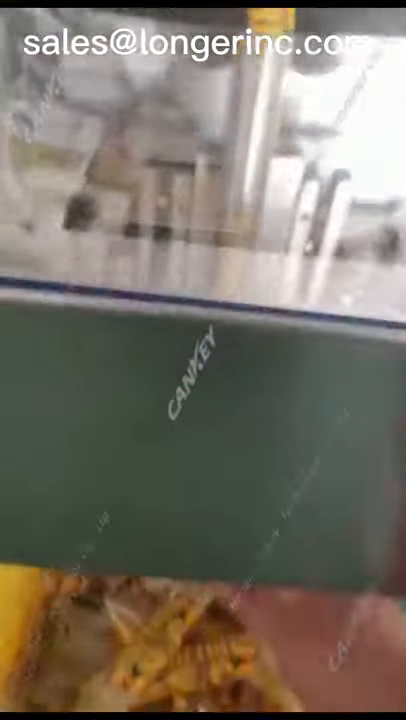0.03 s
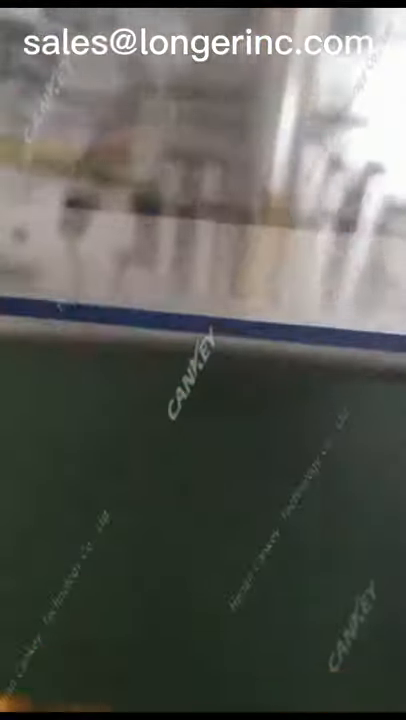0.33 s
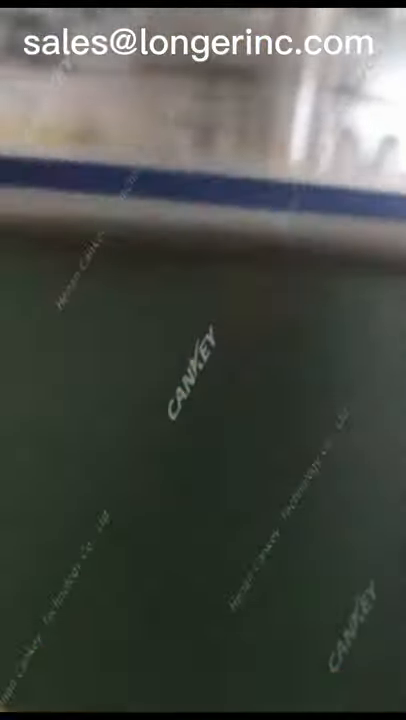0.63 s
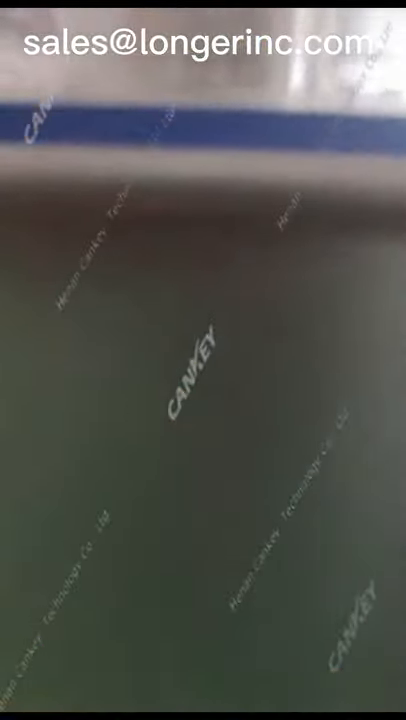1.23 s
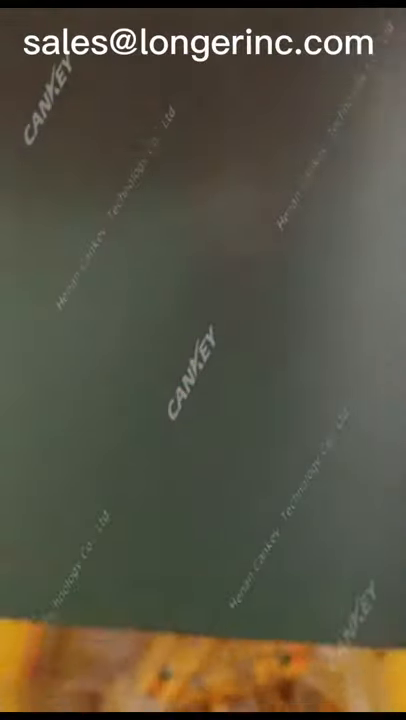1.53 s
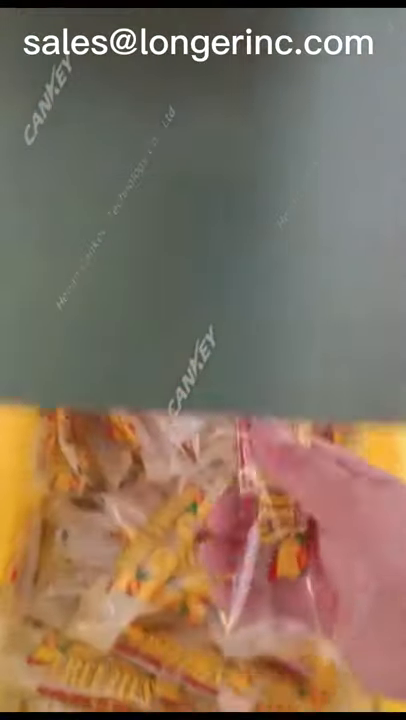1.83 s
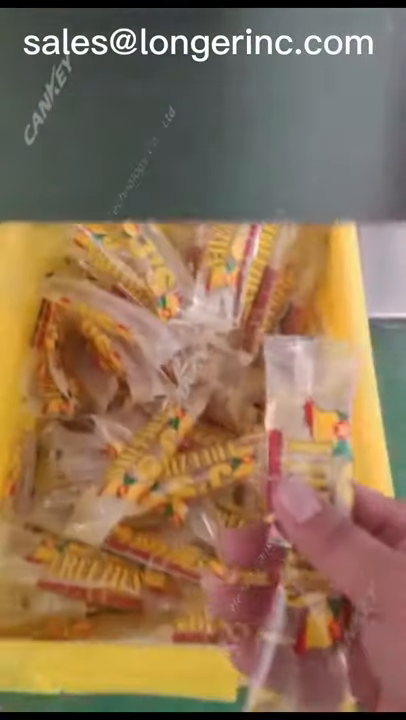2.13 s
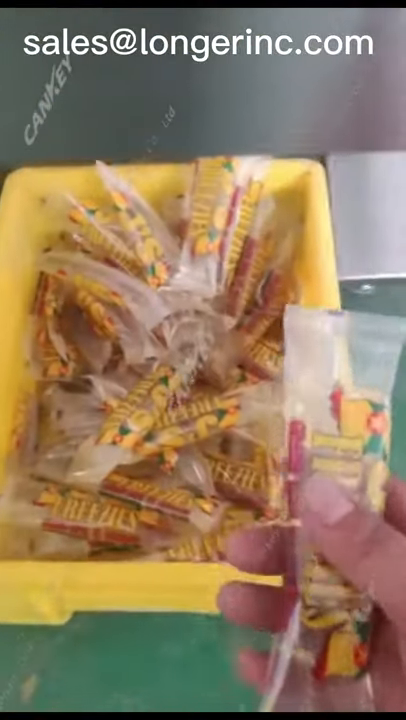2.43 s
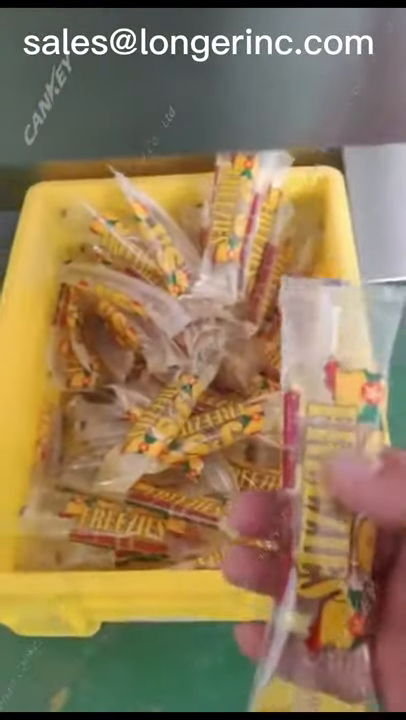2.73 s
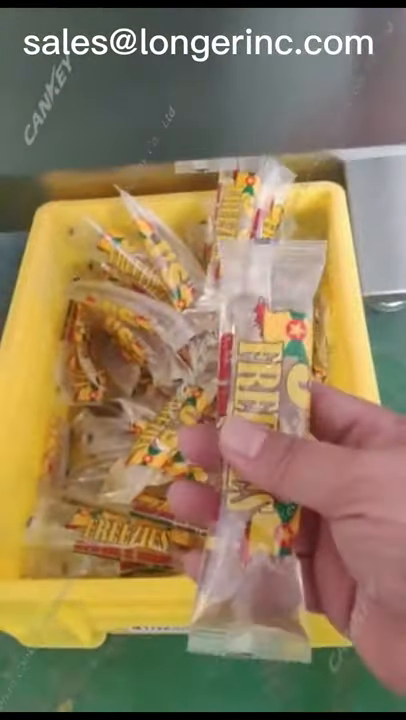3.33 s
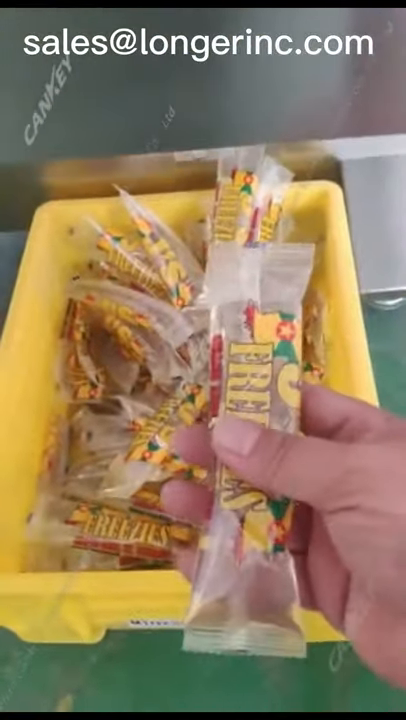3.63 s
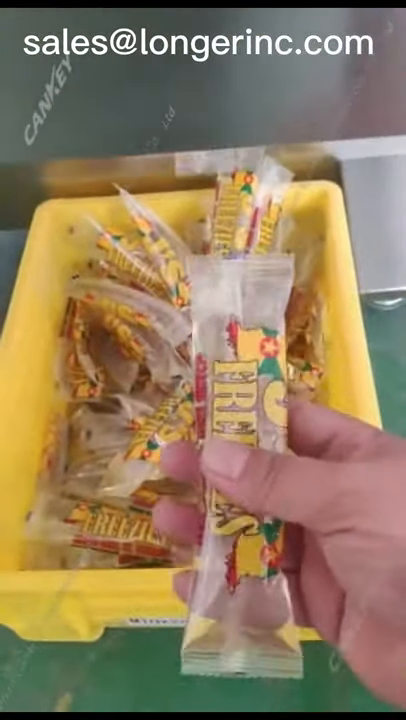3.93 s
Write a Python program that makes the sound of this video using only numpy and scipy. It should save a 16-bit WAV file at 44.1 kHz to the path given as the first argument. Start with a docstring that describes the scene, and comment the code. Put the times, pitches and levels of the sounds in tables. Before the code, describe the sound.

A packaging machine hums, hisses and whines while a hand rustles plastic pouches.

```python
"""A packaging machine idles in a factory hall throughout: low hum, air hiss and a motor's fluttering
4.2 kHz whine that swells and fades on each side. At 0.2 s a hand touches filled film pouches in a plastic
crate. From 1 s it digs in and lifts one out: pouches bump dully, film slides and rustles, creases snap.
After 2.7 s the machine is heard alone; from 3.5 s come a few last snaps, bumps and a short slide."""
import sys
import numpy as np
from scipy import signal
from scipy.fft import rfft, irfft, next_fast_len
from scipy.io import wavfile
from scipy.ndimage import uniform_filter1d, map_coordinates

SR = 44100
rng = np.random.default_rng(int(sys.argv[2]) if len(sys.argv) > 2 else 0)


def master(y):
    """Save y as 16-bit WAV."""
    cut = np.clip(np.atleast_2d(y).T, -1, 1)
    pcm = np.round(cut * 32767)  # scale
    wavfile.write(sys.argv[1], SR, pcm.astype(np.int16))


N = 176400

# left-right likeness: freq_hz, correlation
STEREO_LIKENESS = [(40, .87), (150, .88), (350, .76), (700, .35), (1500, 0), (2400, -.15), (7000, .05)]
# machine hum: freq_hz, density_db
HUM_SPECTRUM = [(12, -40.5), (20, -2.5), (86, -2.5), (125, -0.5), (150, -9), (171, -8.5), (198, -11),
                (308, -10.5), (427, -16), (456, -17.5), (733, -20), (782, -39), (1000, -28), (1300, -65),
                (2200, -120)]
# hum swell: time_s, gain_db
HUM_SWELL = [(0,-0.5), (1.3,3.5), (1.8,-3), (2.1,-2), (4,0)]
# air hiss: freq_hz, density_db
HISS_SPECTRUM = [(450, -48), (800, -10.5), (1050, -18), (1500, -18), (2000, -17), (2400, -17),
                 (3000, -21.5), (3850, -24), (4080, -20), (4330, -16.5), (4600, -23), (5000, -24.5),
                 (5450, -23), (5800, -19.5), (6350, -14.5), (6700, -16.5), (7450, -17.5), (9000, -65.5)]
# hiss swell: time_s, gain_db
HISS_SWELL = [(0, 4), (.6, -0.5), (.93, -1.5), (1.3, 6), (2.4, 1.5), (2.7, 3.5), (3.2, 2.5), (4, 2)]
# hiss balance: freq_hz, left_minus_right_db
HISS_BALANCE = [(800, -4.5), (2400, 2), (4500, 3), (6000, -1), (7200, -1.5)]
# low tones of the drives: pitch_hz, level_db
DRIVE_TONES = [(80.7,-52), (117.5,-51.5)]
# weak second whine, its sidebands and two faint tones: pitch_hz, level_db
FAINT_TONES = [(4000, -61), (4010, -56), (4047, -65), (3753, -64.5), (6315, -62)]
# motor whine pitch: time_s, pitch_hz
WHINE_GLIDE = [(0, 4246), (.35, 4238), (.47, 4250), (1.3, 4249), (2.4, 4248), (2.8, 4238), (3.02, 4234),
               (3.15, 4249), (4, 4250)]
# whine carrier and sidebands: offset_hz, level_db
WHINE_LINES = [(0, 4.5), (47.5, -7), (-68, -16), (68, -17), (138, -19.5)]
# whine swell: time_s, left_gain_db, right_gain_db
WHINE_SWELL = [(.03, -47, -46), (.12, -45, -39), (.26, -41, -45), (.32, -49, -52), (.38, -39, -43),
               (.47, -42, -47), (.65, -39, -40), (1.0, -43.5, -40), (1.2, -45, -38.5), (1.32, -40, -42),
               (1.45, -41, -50), (1.57, -52, -54), (1.85, -52, -56), (2.02, -41, -56), (2.22, -47, -57),
               (2.52, -42, -52), (2.8, -34, -50), (3.03, -35.5, -51), (3.13, -43.5, -62),
               (3.38, -43.5, -57), (3.54, -43, -46), (3.78, -45, -56), (3.97, -39, -52)]
# film slides: start_s, length_s, level_db, left_minus_right_db, tilt_db_per_octave, pouch_resonance_db
FILM_STROKES = [(0.2,0.044,-37,0,-2.5,-12), (1.086,.037,-39.5,-9,-1,3), (1.273,0.123,-32.5,4.5,-2,5),
                (1.418,0.076,-33.5,5.5,0.5,5.5), (1.527,0.19,-37,-1.5,1.5,-1.5), (1.867,0.21,-37.5,2,1,-6),
                (2.118,0.16,-36,-2,3,-12.5), (2.284,0.06,-33,3.5,-0.5,5.5), (3.952,0.036,-30.5,4.5,2,-11)]
# sliding film: freq_hz, density_db
FILM_SPECTRUM = [(200, -15.5), (600, 0), (1000, -9), (1700, -3.5), (2600, -3.5), (3600, -4.5), (5000, -3),
                 (6200, -2), (7100, 0.5), (7550, 5.5), (7900, -48.5)]
# buckling creases: start_s, level_db, left_minus_right_db, flurry_gain_db, flurry_fade_s,
# sheet_gain_db, sheet_ring_hz
CREASE_SNAPS = [(.2136, -20, -9.5, -11, .004, -4, 2510), (.4888, -18, -7, -12, .004, -2, 4080),
                (1.104, -20, 7, -6, .003, -1, 2810), (1.356, -13, 0, -12, .002, -3, 4090),
                (1.3765, -14, -8, -9, .0015, -16, 3300), (1.4305, -22, 5, -3, .009, 10, 3300),
                (1.4462, -11, -4, -10, .003, -8, 3240), (1.464, -10, -2, -11, .0015, -4, 3350),
                (1.538, -24, -8, -7, .004, -10, 2400), (1.606, -17.5, -7, -7, .004, -8, 2700),
                (1.6145, -16, -8, -9, .003, -6, 2830), (1.7723, -15, -6, -7, .003, -10, 3940),
                (1.7866, -13, -5, -6, .002, -6, 3470), (1.789, -12.5, 6.5, -10, .0015, -5, 4400),
                (1.826, -27, 8, -9, .003, -12, 2400), (1.9152, -7, 6, -11, .0017, -8, 3900),
                (1.9255, -17, 0, -6, .002, -8, 3900), (1.938, -21, 2, -7, .002, 6, 3700),
                (1.9458, -11.5, -9, -13, .003, -7, 4400), (1.974, -16, -9, -5, .0025, -12, 3540),
                (2.0478, -13, -10, -8, .0015, -8, 2430), (2.072, -22, -9, -10, .002, -5, 3950),
                (3.5535, -18.5, -4, -10, .003, -4, 4600), (3.784, -25, -5, -5, .006, -7, 4400),
                (3.971, -25, 2, -7, .004, -8, 2240), (3.9817, -13, 9, -10, .003, -6, 2270)]
# bright ring of a crease: freq_hz, density_db
CREASE_SPECTRUM = [(2000, -49), (4000, -13.5), (5500, -19.5), (6500, 5), (7100, 10.5), (7800, 5),
                   (8400, -20.5)]
# lower ring of the sheet around it: freq_hz, density_db
SHEET_SPECTRUM = [(400, -28), (1300, -15.5), (2500, -4), (4000, -1), (4800, 1.5), (5700, 4.5),
                  (8000, -40.5)]
# pouches hitting the crate: start_s, rise_s, level_db, t60_s, thud_vs_knock_db, note_hz, note_vs_knock_db
POUCH_BUMPS = [(1, .024, -30.5, 0.39, -13, 572, -4.5), (1.09, 0.022, -47, 0.5, 1, 406, -7),
               (1.282, 0.016, -32.5, 0.22, 1.5, 195, 3.5), (1.334, 0.018, -43, 0.45, -10, 379, 5.5),
               (2.29, 0.038, -41, 0.32, -16, 344, -6.5), (2.58, 0.07, -40, 0.31, -18.5, 406, -8.5),
               (3.68, .017, -35.5, 0.62, -10.5, 703, -7.5), (3.77, 0.02, -48, 0.18, 6.5, 706, 0.5)]
# filled crate's resonances: centre_hz, width_hz, gain_db
CRATE_MODES = [(344, 47, 2.5), (394, 40, 2), (487, 120, -8.5), (572, 22, 1.5), (709, 89, -6.5),
               (985, 100, -11), (1445, 49, -8)]
# deep thud: freq_hz, density_db
THUD_SPECTRUM = [(60, -12.5), (130, -0.5), (200, 11.5), (280, -1.5), (450, -34.5), (1000, -63.5)]
# hall decay: freq_hz, t60_s
HALL_DECAY = [(200, 0.37), (2000, 0.2), (8000, 0.84)]

TREBLE_EDGE_HZ = 7500
TIME_S = np.arange(N) / SR
OPPOSED = np.array([[.5], [-.5]])  # splits a difference between left and right


def amp(db):
    """Decibels to gain."""
    return 10 ** (np.asarray(db) / 20)


def unit(x):
    """Scale to rms 1."""
    return x / np.sqrt(np.mean(np.abs(x) ** 2) + 1e-20)


def along(points, hz):
    """Interpolate (freq_hz, value) points on a log axis."""
    freqs_hz, values = np.transpose(points)
    return np.interp(np.log(hz + 1), np.log(freqs_hz + 1), values)


def curves(rows):
    """One value per sample for each column after time_s."""
    times_s, *columns = np.transpose(rows)
    return np.array([np.interp(TIME_S, times_s, column) for column in columns])


def wobble(rate_hz):
    """Smooth random curve, rate_hz knots a second."""
    knots = rng.standard_normal(int(N * rate_hz / SR) + 4)
    return map_coordinates(knots, [TIME_S * rate_hz])


def ripple(hz, spacing_hz, depth_db):
    """Random spectral peaks and dips, as from the modes of a wall or crumpled sheet."""
    knots = rng.standard_normal(4096)
    return amp(depth_db * np.tanh(map_coordinates(knots, [hz / spacing_hz], mode="mirror")))


def filtered(x, response):
    """Apply a frequency response by FFT."""
    n = x.shape[-1]
    padded = next_fast_len(n + n // 10)
    return irfft(rfft(x, padded) * response(np.fft.rfftfreq(padded, 1 / SR)), padded)[..., :n]


def lowpass(hz, edge_hz):
    """Gain of a very steep low-pass."""
    return 1 / np.sqrt(1 + (hz / edge_hz) ** 160)


def pan(side_db):
    """Left and right gains."""
    return amp(OPPOSED * side_db)


def spread_rad(hz):
    """Angle between left and right: small in the bass, near 90 degrees in the treble."""
    return np.arccos(along(STEREO_LIKENESS, hz))


def stereo_noise(response):
    """Shaped noise of rms 1, alike in the bass, unrelated in the treble."""
    def mid_side(hz):
        angle = spread_rad(hz) / 2
        return response(hz) * np.array([np.cos(angle), np.sin(angle)])
    mid, side = filtered(rng.standard_normal((2, N)), mid_side)
    return unit(np.array([mid + side, mid - side]))


def machine_hum(base_db=-37, swing_db=1):
    """The idling machine's low, wavering noise."""
    gain = amp(base_db + curves(HUM_SWELL) + swing_db * wobble(7.91))
    return gain * stereo_noise(lambda hz: amp(along(HUM_SPECTRUM, hz)))


def air_hiss(base_db=-45, swing_db=1.5):
    """Air noise coloured by the metal housing."""
    def colour(hz):
        housing = ripple(hz, spacing_hz=30.07, depth_db=3.5)
        balance = pan(along(HISS_BALANCE, hz))
        return amp(along(HISS_SPECTRUM, hz)) * housing * balance * lowpass(hz, TREBLE_EDGE_HZ)
    return stereo_noise(colour) * amp(base_db + curves(HISS_SWELL) + swing_db * wobble(20))


def drive_tones(drift_rad=.55, swing_db=1.5):
    """Weak tones of the drives, wandering in phase and level."""
    out = np.zeros((2, N))
    for hz, db in DRIVE_TONES + FAINT_TONES:
        phase = 2 * np.pi * hz * TIME_S + drift_rad * wobble(9)
        apart_rad = OPPOSED * spread_rad(hz) * (1 + wobble(2.4) / 2) / 2
        out += np.sqrt(2) * amp(db + swing_db * wobble(4.19)) * np.sin(phase + apart_rad)
    return out


def motor_whine(flutter_db=.8, jitter_rad=.08):
    """High motor tone with rotation sidebands; left and right sit apart in its standing waves."""
    carrier_rad = 2 * np.pi * np.cumsum(curves(WHINE_GLIDE)) / SR + jitter_rad * wobble(140)
    out = np.zeros((2, N))
    for offset_hz, db in WHINE_LINES:
        apart_rad = .8 * OPPOSED * (1 + wobble(2) / 2)
        phase = carrier_rad + 2 * np.pi * (offset_hz * TIME_S + rng.random())
        out += amp(db) * np.sin(phase + apart_rad + wobble(2) / 2)
    return out * amp(curves(WHINE_SWELL) + flutter_db * wobble(40))


def film_rustle(gain_db=1, grains_per_s=2200, spread_db=1.5, clump_db=4, swish_db=-6):
    """Film slides on film: clumped grains over a soft swish; each stroke bends new sheet resonances."""
    attack_s, release_s = .02, .015
    pouch_hz, pouch_width_hz = 3280, 350
    out = np.zeros((2, N + SR))
    t = np.arange(SR // 4) / SR
    for start_s, length_s, db, side_db, tilt_db_per_octave, pouch_db in FILM_STROKES:
        def colour(hz):
            resonance_db = pouch_db * np.exp(-((hz - pouch_hz) / pouch_width_hz) ** 2)
            shape_db = along(FILM_SPECTRUM, hz) + tilt_db_per_octave * np.log2(hz + 1) + resonance_db
            modes = ripple(hz, spacing_hz=198.6, depth_db=7.5)
            return amp(shape_db) * modes * lowpass(hz, TREBLE_EDGE_HZ)
        effort = np.minimum(t / attack_s, 1) * np.exp(-np.maximum(t - length_s, 0) / release_s)
        hits = rng.random(len(t)) < grains_per_s / SR
        sizes = hits * amp(spread_db * np.minimum(rng.exponential(size=len(t)), 2))
        grains = unit(sizes * np.sign(rng.standard_normal((2, len(t)))))
        swish = amp(swish_db) * rng.standard_normal((2, len(t)))
        clumps = amp(clump_db * wobble(129.6)[:len(t)])
        film = unit(filtered((grains + swish) * clumps, colour))
        out[:, round(start_s * SR):][:, :len(t)] += amp(db + gain_db) * pan(side_db) * effort * film
    return out[:, :N]


def crease_snaps(gain_db=1, flurry_trim_db=.5, sheet_trim_db=-.5, grain_db=3):
    """A crease buckles: one sharp click amid a flurry of tiny ones, ringing crease and sheet."""
    ring_db, ring_width_hz, lag_spread_s = 8, 500, .0002
    rise_s, tail_db, tail_t60_s = .0009, -22, .05
    out = np.zeros((2, N + SR))
    t = np.arange(-SR // 100, SR // 10) / SR  # click at t = 0
    after_s = np.maximum(t, 0)
    rise = np.exp(np.minimum(t, 0) / rise_s)
    tail = amp(tail_db - 60 * after_s / tail_t60_s)
    for start_s, db, side_db, flurry_db, fade_s, sheet_db, ring_hz in CREASE_SNAPS:
        lag_s = lag_spread_s * rng.standard_normal((2, 1))

        def colour(hz):
            crease = unit(amp(along(CREASE_SPECTRUM, hz)) * ripple(hz, spacing_hz=505, depth_db=3.5))
            ring = 1 + amp(ring_db) / (1 + 2j * (hz - ring_hz) / ring_width_hz)
            sheet = unit(amp(along(SHEET_SPECTRUM, hz)) * ring)
            return (crease + amp(sheet_db + sheet_trim_db) * sheet) * np.exp(-2j * np.pi * hz * lag_s)
        click = filtered(1.0 * (t == 0), colour)
        click /= np.abs(click).max(axis=-1, keepdims=True)
        envelope = rise * (np.exp(-after_s / fade_s) + tail)
        sizes = envelope * amp(grain_db * unit(uniform_filter1d(rng.standard_normal(len(t)), size=30)))
        grains = filtered(sizes * rng.standard_normal((2, len(t))), colour)
        flurry = np.array([unit(side) for side in grains]) * np.sqrt(np.mean(envelope ** 2))
        snap = click + amp(flurry_db + flurry_trim_db) * flurry
        out[:, round((start_s + t[0]) * SR):][:, :len(t)] += amp(db + gain_db) * pan(side_db) * snap
    return out[:, :N]


def pouch_bumps(waver_rad=.5, rolloff_hz=2500):
    """Soft pouches hit the crate, which knocks and thuds; each spot favours one hollow note."""
    def crate(hz):
        modes = 0
        for k, (centre_hz, width_hz, db) in enumerate(CRATE_MODES):
            damping = 1j * hz * width_hz
            modes += (-1) ** k * amp(db) * damping / (centre_hz ** 2 - hz ** 2 + damping)
        return modes / (1 + (hz / rolloff_hz) ** 2)
    knock = stereo_noise(crate)
    thud = stereo_noise(lambda hz: amp(along(THUD_SPECTRUM, hz)))
    out = np.zeros((2, N))
    for start_s, rise_s, db, t60_s, thud_db, note_hz, note_db in POUCH_BUMPS:
        age_s = TIME_S - start_s
        envelope = np.clip(age_s / rise_s, 0, 1) * amp(db - 60 * np.maximum(age_s - rise_s, 0) / t60_s)
        note = unit(np.sin(2 * np.pi * note_hz * TIME_S + waver_rad * wobble(60)))
        out += envelope * (knock + amp(thud_db) * thud + amp(note_db) * note)
    return out


def hall_reverb(x, gain_db=-12.5):
    """The hall's diffuse tail, shortest near 2 kHz."""
    hz, t, spectra = signal.stft(rng.standard_normal((2, SR // 2)), SR, nperseg=256)
    decay = amp(-60 * t / along(HALL_DECAY, hz)[:, None])
    _, tail = signal.istft(spectra * decay, SR, nperseg=256)
    wet = signal.fftconvolve(x, tail / np.linalg.norm(tail[0]), axes=1)[:, :N]
    return amp(gain_db) * filtered(wet, lambda hz: lowpass(hz, TREBLE_EDGE_HZ))


def scene():
    """Machine all around; pouches close by, echoing in the hall."""
    pouches = crease_snaps() + film_rustle() + pouch_bumps()
    machine = machine_hum() + air_hiss() + drive_tones() + motor_whine()
    return machine + pouches + hall_reverb(pouches)


def record(dry):
    """Steep band limit."""
    return filtered(dry, lambda hz: lowpass(hz, edge_hz=8700))


dry = scene()
out = record(dry)
master(out)
```